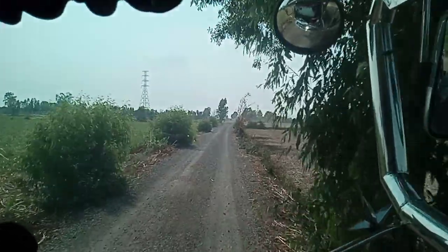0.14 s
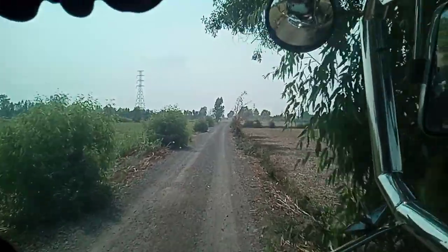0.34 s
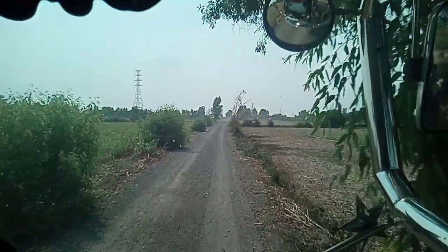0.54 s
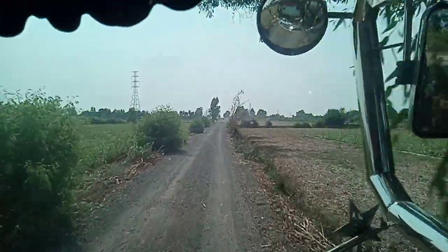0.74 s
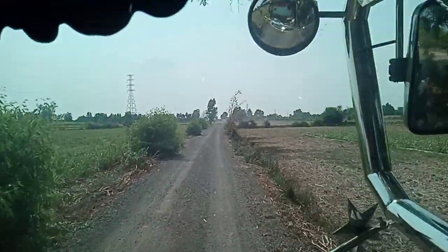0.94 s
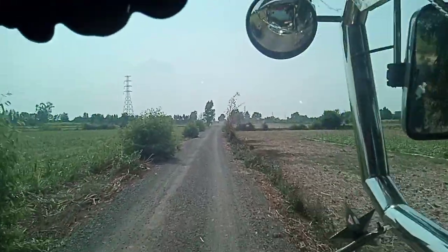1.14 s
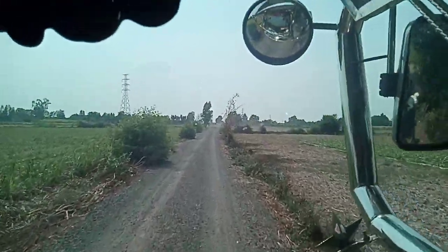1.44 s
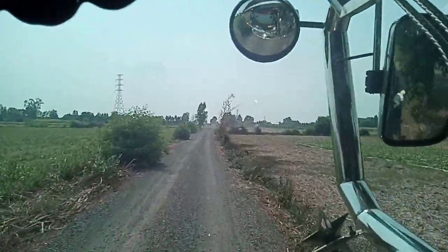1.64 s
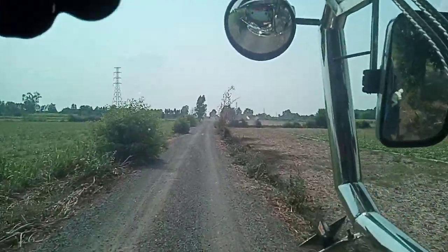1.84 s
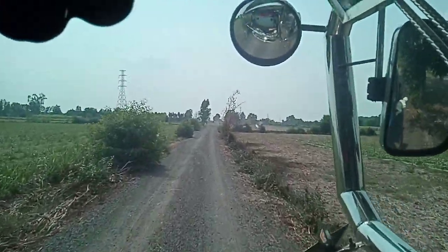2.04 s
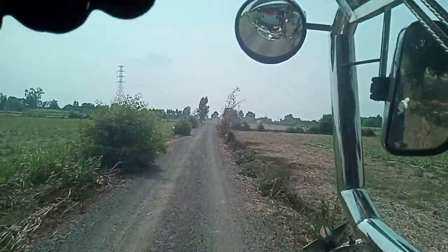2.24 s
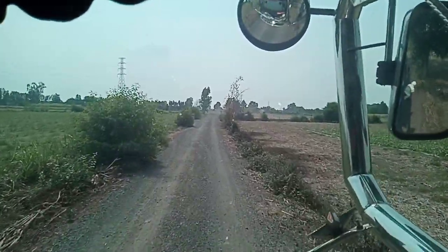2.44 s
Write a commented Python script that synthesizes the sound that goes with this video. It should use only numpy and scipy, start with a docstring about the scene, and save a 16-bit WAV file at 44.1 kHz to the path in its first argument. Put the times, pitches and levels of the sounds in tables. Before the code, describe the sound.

Inside a truck cab on a rough dirt road, the deep diesel drone rises, cuts back for a gear change while bodywork knocks and loose metal clatters, then returns lower and unsteady over grinding gravel.

```python
"""Inside the cab of a diesel dump truck changing up a gear on a dirt road, heard from the seat.
The engine booms under load, drops to a ragged rumble, then pulls again at lower revs: multiples of its
firing rate, coloured by the cab. Shaped noise makes the chassis rumble and the grind of tyres on gravel.
Loose parts knock, clack and jingle as resonances, ruts thump as short swells of tone, stones tick as
noise bursts, and sliding tones squeak rapidly."""
import sys
import numpy as np
from scipy import signal
from scipy.fft import rfft, irfft
from scipy.io import wavfile
from scipy.ndimage import uniform_filter1d

SR = 44100
rng = np.random.default_rng(int(sys.argv[2]) if len(sys.argv) > 2 else 0)


def wav_record(signal):
    """Record a signal, one row per channel, as 16-bit PCM in the file named by sys.argv[1]."""
    frames = np.transpose(np.atleast_2d(signal))
    bounded = np.clip(frames, -1, 1)
    # unit amplitude maps onto the largest positive 16-bit level
    quanta = np.round(bounded * 32767).astype(np.int16)
    wavfile.write(sys.argv[1], SR, quanta)


N = 114660
T = np.arange(N) / SR
GRAIN_PER_S = 76  # rate of the grain in the tyre noise and the squeaks


def from_db(db):
    """Decibels to gain."""
    return 10 ** (np.asarray(db) / 20)


def rms_one(x):
    """Scale to unit rms."""
    return x / np.sqrt(np.mean(x ** 2) + 1e-20)


def in_time(rows):
    """Each column of a curve, interpolated at every sample."""
    s, *columns = np.transpose(rows)
    return [np.interp(T, s, c) for c in columns]


def gain_at(points, hz):
    """Gain of a spectrum at the given frequencies, interpolated over log frequency."""
    f, db = np.transpose(points)
    return from_db(np.interp(np.log(hz + 1e-6), np.log(f), db))


def rfft_hz():
    """Frequencies of the spectrum bins."""
    return np.arange(N // 2 + 1) * SR / N


def drift(rate_hz):
    """Random wandering of unit rms, mostly slower than the given rate."""
    spectrum = rfft(rng.standard_normal(N))
    return rms_one(irfft(spectrum / (1 + (rfft_hz() / rate_hz) ** 2), N))


def noise(points):
    """Noise of unit rms with the given spectrum."""
    spectrum = rfft(rng.standard_normal(N))
    return rms_one(irfft(spectrum * gain_at(points, rfft_hz()), N))


def ring(x, hz, width_hz):
    """One two-pole resonance; a unit click rings at height 1."""
    r = np.exp(-np.pi * width_hz / SR)
    w = 2 * np.pi * hz / SR
    feed, feedback = [np.sin(w) / 2, 0, -np.sin(w) / 2], [1, -2 * r * np.cos(w), r * r]
    return signal.lfilter(feed, feedback, x + 1e-18) / np.sin(w)


def chatter(modes):
    """Resonances shaken by dense random contacts, held near unit rms."""
    x = 0
    for hz, width, db in modes:
        once = ring(rng.standard_normal(N), hz, 2 * width)
        x = x + from_db(db) * rms_one(ring(once, hz, 2 * width))
    power = uniform_filter1d(uniform_filter1d(x ** 2, size=200), size=200)
    return x / np.sqrt(power + 1e-12)


def blow(x, start_s, attack_s, t60_s):
    """A burst of x that rises quickly and dies away, its strength evened."""
    age = np.maximum(T - start_s, 0)
    shape = np.minimum(age / attack_s, 1) * from_db(-60 * np.minimum(age / t60_s, 5))
    burst = x * shape
    return burst * np.sqrt(np.sum(shape ** 2) / (np.sum(burst ** 2) + 1e-20))


def turn(hz):
    """Running phase of a frequency curve, in radians."""
    return 2 * np.pi * np.cumsum(hz) / SR


# engine speed through the gear change: time_s, firings_per_s
ENGINE_SPEED = [(0, 54.8), (.14, 55.8), (.32, 56.7), (.49, 57.7), (.6, 59), (.7, 55), (.95, 47),
                (1.2, 45.5), (1.65, 40.3), (1.78, 40.5), (1.92, 33.5), (2.04, 38), (2.22, 37), (2.31, 37.6),
                (2.4, 39.6), (2.6, 40.2)]
# strength of the exhaust note at the seat: time_s, level_db
EXHAUST_LEVEL = [(0, -10), (.12, -6.5), (.57, -8.5), (.615, -20.5), (.66, -19), (.71, -33), (.95, -34.5),
                 (1.12, -27.5), (1.25, -23.5), (1.55, -40), (1.61, -24.5), (1.97, -23.5), (2.04, -15.5),
                 (2.19, -17.5), (2.33, -12.5), (2.42, -20), (2.55, -13.5), (2.6, -21)]
# unevenness of the firings: time_s, roughness (0-1)
UNEVENNESS = [(0, .1), (.55, .08), (.7, .5), (1.9, .4), (2.1, .22)]
# how the cab passes the exhaust note: frequency_hz, gain_db
CAB_BOOM = [(33, -25), (56, -27.5), (78, -14.5), (95, -5.5), (113, 1), (126, 1), (147, -15), (164, -4.5),
            (192, -20), (220, -27), (238, -12), (262, -21), (284, -16.5), (340, -35), (395, -32),
            (800, -54)]
WAVER_PER_S, HALF_ORDER_DB = 15, -6.5
SHAKE_REF_HZ = 140  # the shake grows with frequency, equals the roughness here and doubles by twice this


def exhaust(firing, phase):
    """Multiples of the firing rate boom in the cab; uneven firing shakes the upper ones most, adds half orders."""
    (level_db,), (rough,) = in_time(EXHAUST_LEVEL), in_time(UNEVENNESS)
    out, power = 0, 0
    for order in np.arange(2, 29) / 2:
        hz = order * firing
        wander = (drift(WAVER_PER_S) + 1j * drift(WAVER_PER_S)) / np.sqrt(2)
        shake = rough * np.minimum(hz / SHAKE_REF_HZ, 2) * wander
        # half orders exist only through the unevenness
        strength = 1 + shake if order % 1 == 0 else from_db(HALF_ORDER_DB) * shake
        size = gain_at(CAB_BOOM, hz) * strength
        start_phase = 2 * np.pi * rng.random()
        out = out + np.real(size * np.exp(1j * (order * phase + start_phase)))
        power = power + np.abs(size) ** 2 / 2
    return from_db(level_db) * out / np.sqrt(power)


# rumble of the chassis under the seat: time_s, level_db
CHASSIS_LEVEL = [(0, -26.5), (.55, -26), (.72, -27), (.89, -30), (1.03, -24.5), (1.17, -20.5),
                 (1.35, -25.5), (1.54, -26.5), (1.75, -21.5), (2.2, -26), (2.38, -22), (2.6, -26)]
# its relative spectrum: frequency_hz, density_db_per_hz
CHASSIS_SPECTRUM = [(20, -32), (40, -8), (62, -5), (85, 8), (125, 4.5), (165, 5), (205, -5), (235, 0.5),
                    (260, -8.5), (315, -7.5), (400, -14), (520, -27.5), (1500, -110)]


def chassis():
    """Low rumble from the rough road: shaped noise, evened before it follows its level."""
    x = noise(CHASSIS_SPECTRUM)
    even = x / np.sqrt(uniform_filter1d(x ** 2, size=4000))
    return from_db(in_time(CHASSIS_LEVEL)[0]) * even


# the cab thumps over ruts: start_s, peak_db, pitch_hz
RUT_THUMPS = [(0.806, -18.5, 124), (1.175, -13, 90.8), (1.635, -16, 95.9), (1.681, -17, 91)]
THUMP_RISE_S = .013


def thumps():
    """Ruts jolt the cab, which booms for a few cycles."""
    out = 0
    for start_s, peak_db, hz in RUT_THUMPS:
        age = np.maximum(T - start_s, 0)
        swell = age / THUMP_RISE_S
        envelope = swell * np.exp(1 - swell)
        out = out + from_db(peak_db) * envelope * np.sin(2 * np.pi * hz * age)
    return out


# dull knocks of the bodywork: start_s, level_db, centre_hz, t60_s
BODY_KNOCKS = [(.159, -19.5, 948, 0.059), (0.317, -27, 908, 0.057), (.977, -25, 960, 0.034),
               (1.019, -26, 1180, 0.045), (1.123, -26, 1070, 0.056), (1.15, -23, 795, 0.052),
               (1.291, -20.5, 747, 0.044), (1.308, -24.5, 776, 0.066), (1.417, -31, 1320, 0.044),
               (1.782, -18, 933, 0.09)]
# ring of a panel: multiple_of_centre, width_hz, gain_db
PANEL_MODES = [(.87, 135, 9.5), (1.077, 150, 3), (1.496, 248, -6), (2.201, 508, -12)]
KNOCK_ATTACK_S, KNOCK_TOP_HZ = .0022, 3500


def knocks():
    """Bumps rattle the body panels: bursts of a few broad resonances, with the top filtered off."""
    out = 0
    for start_s, db, centre_hz, t60_s in BODY_KNOCKS:
        panel = chatter([(m * centre_hz, width, gain_db) for m, width, gain_db in PANEL_MODES])
        out = out + from_db(db) * blow(panel, start_s, KNOCK_ATTACK_S, t60_s)
    dull = signal.butter(4, KNOCK_TOP_HZ, fs=SR, output="sos")
    return signal.sosfilt(dull, out + 1e-18)


# a loose metal fitting clacks, level before the lowpass: start_s, level_db, brightness_hz, ring_against_crack_db
METAL_CLACKS = [(0.7846, -26, 9250, -7), (.789, -25, 5030, -14.5), (0.797, -25.5, 3000, -6),
                (1.0205, -27.5, 3470, -20), (1.153, -32.5, 3990, -22), (1.629, -30.5, 3600, -11)]
# modes of the fitting: frequency_hz, gain_db, t60_s
FITTING_MODES = [(1680, -9, .07), (2110, -8, .06), (2335, 3, .05), (2712, -1, .06), (3392, -10, .1),
                 (3920, -3, .075), (4742, 0, .06), (5367, -14, .08), (7278, -24, .3), (7558, -19, .08),
                 (8140, -18, .06), (8759, -18, .12), (10630, -23, .15), (11100, -20, .17)]
# crack of the contact, relative: frequency_hz, density_db_per_hz
CRACK_SPECTRUM = [(800, -8.5), (1600, -12.5), (2400, 4), (3300, -4.5), (4600, -9), (6300, -17.5),
                  (8800, -28), (9800, -32.5), (11000, -26), (14700, -23)]
CRACK_ATTACK_S, CRACK_T60_S = .0012, .046


def clacks():
    """A metal fitting strikes and rebounds with a crack and a ring; each contact has its own brightness."""
    out = 0
    for start_s, db, bright_hz, ring_db in METAL_CLACKS:
        age = np.maximum(T - start_s, 0)
        modes = 0
        for hz, mode_db, t60_s in FITTING_MODES:
            decay = from_db(mode_db - 60 * np.minimum(age / t60_s, 2))
            modes = modes + rng.choice([-1, 1]) * decay * np.sin(2 * np.pi * hz * age)
        crack = blow(noise(CRACK_SPECTRUM), start_s, CRACK_ATTACK_S, CRACK_T60_S)
        hit = from_db(ring_db) * modes + crack
        lowpass = signal.butter(2, bright_hz, fs=SR, output="sos")
        out = out + from_db(db) * signal.sosfilt(lowpass, hit + 1e-18)
    return out


# engine clatter and tyres on gravel: time_s, level_db
ROAD_CURVE = [(0, -35.5), (.5, -37), (.92, -39.5), (1.12, -34.5), (1.38, -38.5), (1.7, -35.5), (2.1, -38.5),
              (2.6, -36.5)]
# their relative spectrum: frequency_hz, density_db_per_hz
ROAD_SPECTRUM = [(200, 2.5), (450, -2.5), (650, 1), (980, 1), (1200, -6), (1700, -9.5), (2400, -12.5),
                 (3200, -16), (4200, -23.5), (4700, -34.5), (5300, -42), (8300, -48.5), (9600, -54.5),
                 (15000, -67)]
GRAIN_DB, CLATTER_DEPTH = 1.13, .12


def road(phase):
    """Grainy tyre noise and engine clatter that pulses with each firing."""
    grain = from_db(GRAIN_DB * drift(GRAIN_PER_S))
    clatter = 1 + CLATTER_DEPTH * np.cos(phase)
    return from_db(in_time(ROAD_CURVE)[0]) * rms_one(noise(ROAD_SPECTRUM) * grain * clatter)


# rapid squeaks: middle_s, level_db
SQUEAK_TIMES = [(.443, -48), (0.661, -49), (0.854, -47.5), (0.931, -48), (1.037, -43.5), (1.081, -45.5),
                (1.228, -46), (1.278, -46.5), (1.43, -49), (1.567, -46), (1.605, -44), (1.649, -45.5),
                (1.71, -45.5), (1.838, -45.5), (1.897, -48), (1.934, -44), (1.975, -48.5), (2.012, -42.5),
                (2.063, -44.5), (2.118, -43.5), (2.172, -43), (2.256, -43), (2.307, -41.5), (2.35, -47),
                (2.392, -44.5), (2.449, -49), (2.497, -45.5), (2.581, -47.5)]
# one longer falling squeal: time_s, pitch_hz, level_db
FALLING_SQUEAL = [(1.42, 2220, -68), (1.445, 2200, -49.5), (1.48, 2100, -42.5), (1.522, 1760, -37.5),
                  (1.55, 1700, -56), (1.575, 1230, -44), (1.615, 1170, -47.5)]
SQUEAK_HZ, SQUEAK_JITTER_HZ, SQUEAL_JITTER_HZ = 2770, 60, 59.6
SQUEAK_SLIDE_HZ, SQUEAK_SETTLE_S = 18, .006  # height above the note at mid-chirp, and time to settle
SQUEAK_LENGTH_S, SQUEAK_LENGTH_SPREAD, SQUEAK_GRAIN_DB = .028, .12, 2  # typical length, log spread


def squeaks():
    """Short rough chirps slide down onto one note, and a longer squeal falls."""
    out = 0
    jitter = SQUEAK_JITTER_HZ * drift(390)
    grain = from_db(SQUEAK_GRAIN_DB * drift(GRAIN_PER_S))
    for middle_s, db in SQUEAK_TIMES:
        half_s = SQUEAK_LENGTH_S / 2 * np.exp(SQUEAK_LENGTH_SPREAD * rng.standard_normal())
        near = np.abs(T - middle_s) < half_s
        age = T[near] - middle_s
        slide = SQUEAK_SLIDE_HZ * np.exp(np.minimum(-age / SQUEAK_SETTLE_S, 2))
        tone = np.sin(turn(SQUEAK_HZ + slide + jitter[near]))
        chirp = np.cos(np.pi / 2 * age / half_s) * grain[near] * tone
        padded = np.zeros(N)
        padded[near] = chirp
        out = out + np.sqrt(2) * from_db(db) * padded
    hz, db = in_time(FALLING_SQUEAL)
    sounding = (T > FALLING_SQUEAL[0][0]) & (T < FALLING_SQUEAL[-1][0])
    squeal = np.sin(turn(hz + SQUEAL_JITTER_HZ * drift(200)))
    return out + np.sqrt(2) * from_db(db) * squeal * sounding


# small metal parts jingle: start_s, level_db
JINGLE_TIMES = [(.032, -50), (0.264, -48), (.44, -51), (.716, -49), (.892, -54.5), (1.372, -49),
                (1.552, -50.5), (1.703, -47.5), (1.788, -43), (2.301, -51), (2.508, -49.5)]
# their ring: frequency_hz, width_hz, gain_db
TRINKET_MODES = [(4100, 300, -3), (4330, 150, 0), (6400, 300, -14), (7300, 120, -16), (8550, 250, -20)]
JINGLE_ATTACK_S, JINGLE_T60_S, JINGLE_SPREAD_DB = .005, .08, 2.5


def jingles():
    """Small metal parts shiver briefly, each time with a different mix of their modes."""
    out = 0
    for start_s, db in JINGLE_TIMES:
        modes = [(hz, width, gain_db + JINGLE_SPREAD_DB * rng.standard_normal())
                 for hz, width, gain_db in TRINKET_MODES]
        out = out + from_db(db) * blow(chatter(modes), start_s, JINGLE_ATTACK_S, JINGLE_T60_S)
    return out


# stones tick against the truck: start_s, level_db
STONE_TICKS = [(.283, -56), (1.109, -43), (2.325, -56.5)]
# relative spectrum of a tick: frequency_hz, density_db_per_hz
STONE_SPECTRUM = [(1500, -21.5), (3000, 0), (4400, -2.5), (5400, -9), (8700, -6.5), (9800, -23.5),
                  (14000, -31.5)]
STONE_ATTACK_S, STONE_T60_S = .0015, .04
GRIT_PER_S, GRIT_DB = 27, -70  # the grit spreads 5 dB either side of this level


def stones():
    """Dry ticks of thrown gravel, over a random patter of faint grit."""
    tick = noise(STONE_SPECTRUM)
    draws = rng.random((int(GRIT_PER_S * N / SR), 2))
    grit = [(u * N / SR, GRIT_DB + 10 * (v - .5)) for u, v in draws]
    out = 0
    for start_s, db in list(STONE_TICKS) + grit:
        out = out + from_db(db) * blow(tick, start_s, STONE_ATTACK_S, STONE_T60_S)
    return out


def scene():
    """Everything as heard from the seat, in one channel."""
    firing, = in_time(ENGINE_SPEED)
    phase = turn(firing)
    engine_and_ride = exhaust(firing, phase) + chassis() + thumps()
    rattles = knocks() + clacks() + squeaks() + jingles() + stones()
    return (engine_and_ride + road(phase) + rattles)[None]


CUTOFF_HZ, CEILING = 15600, .95


def record(dry):
    """The highest peaks are rounded below the ceiling and the top of the treble is cut."""
    rounded = dry / (1 + (dry / CEILING) ** 10) ** (1 / 10)
    # the filter's stopband begins 800 Hz above the cutoff, 70 dB down
    lowpass = signal.cheby2(12, 70, CUTOFF_HZ + 800, fs=SR, output="sos")
    return signal.sosfilt(lowpass, rounded)


dry = scene()
out = record(dry)
wav_record(out)
```